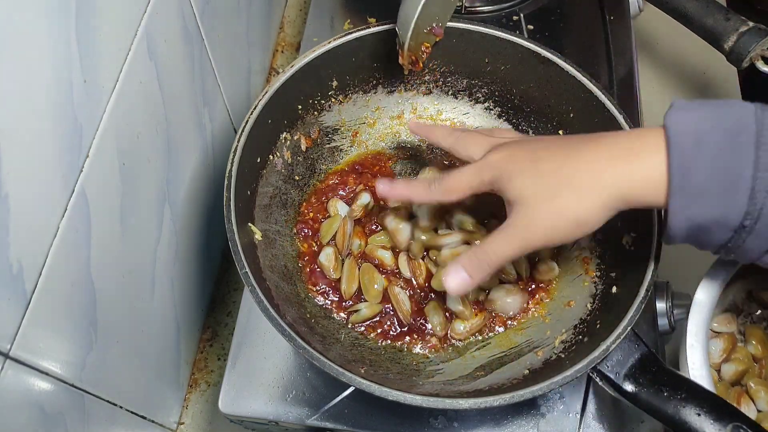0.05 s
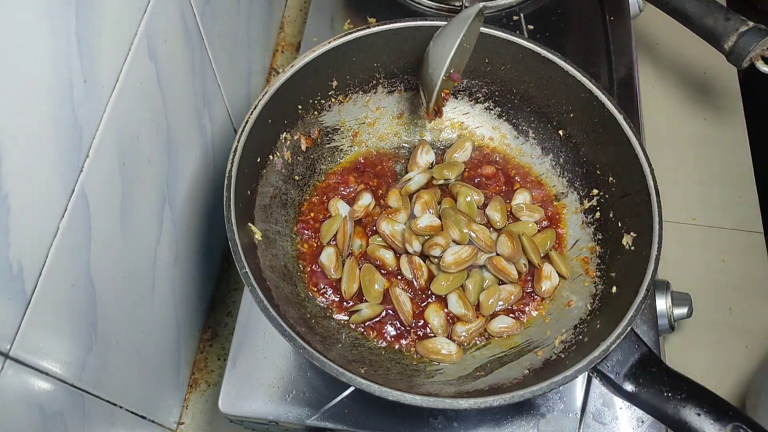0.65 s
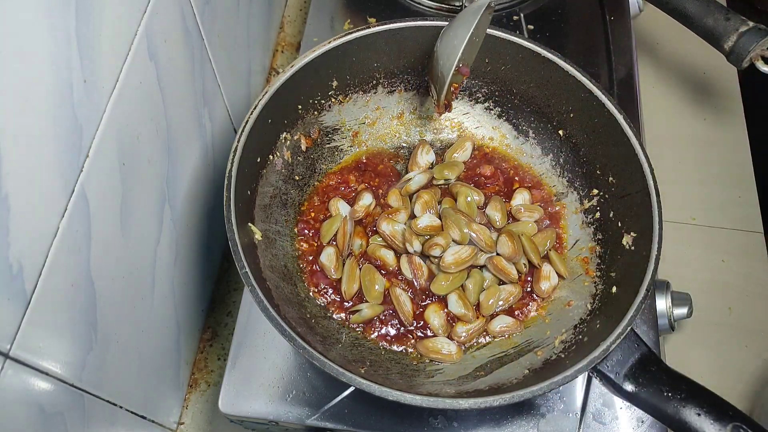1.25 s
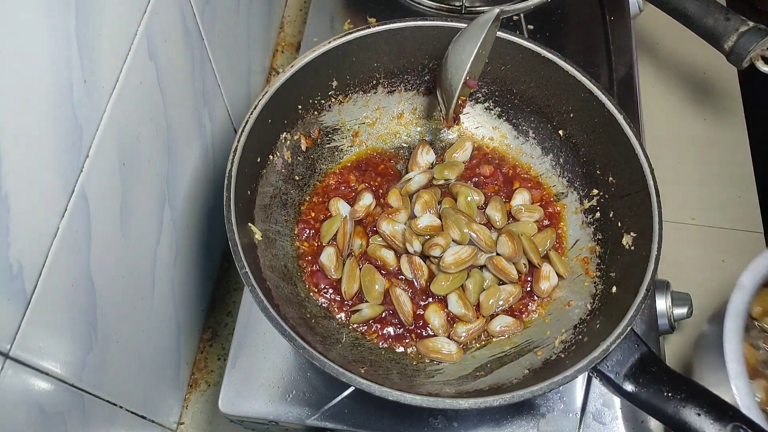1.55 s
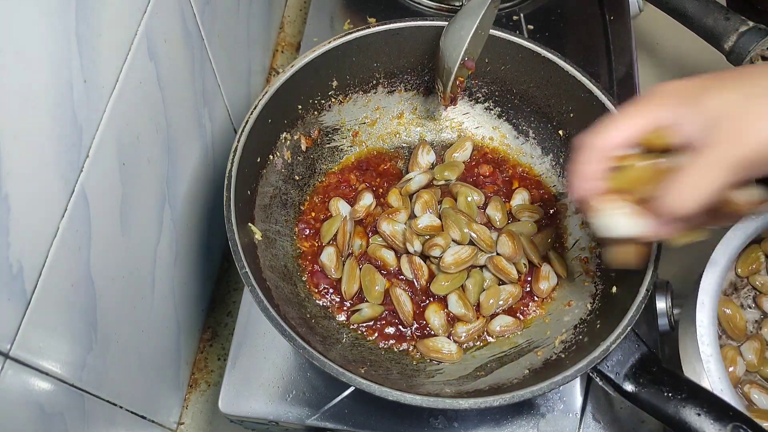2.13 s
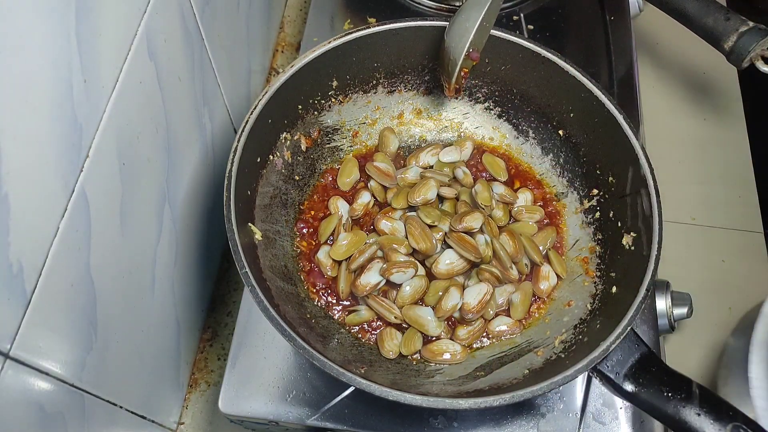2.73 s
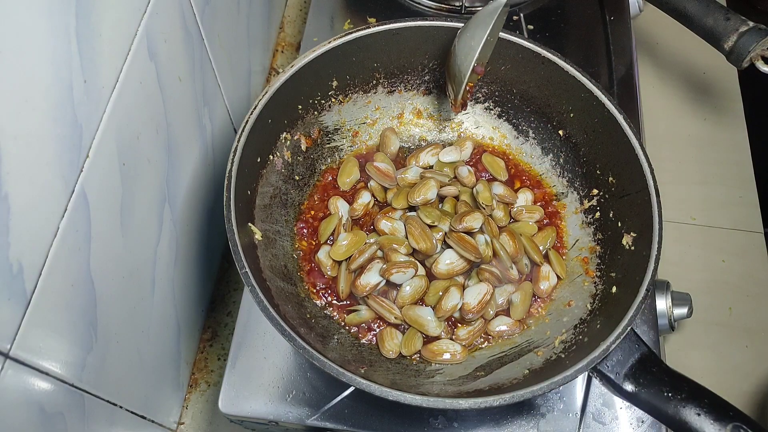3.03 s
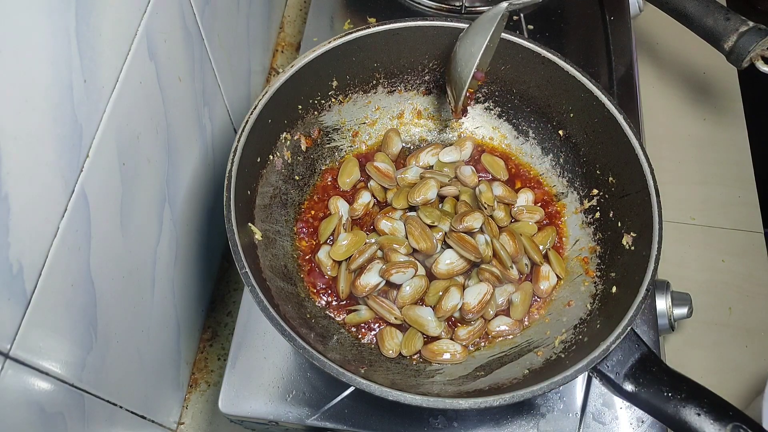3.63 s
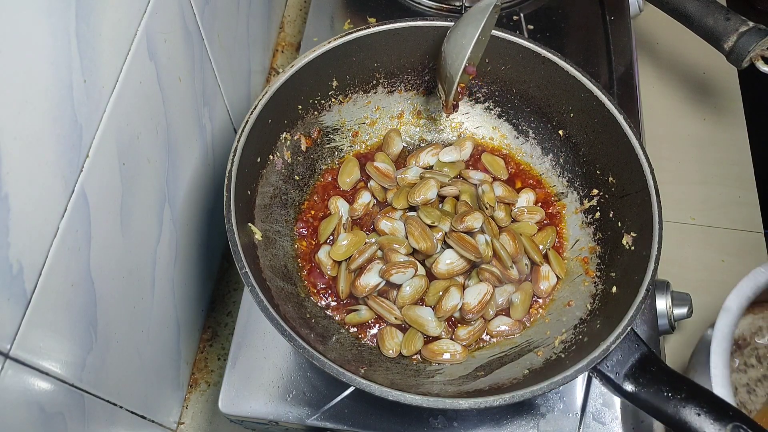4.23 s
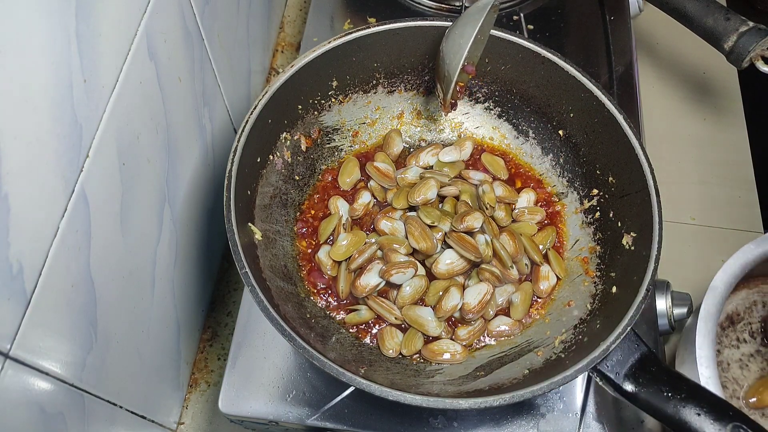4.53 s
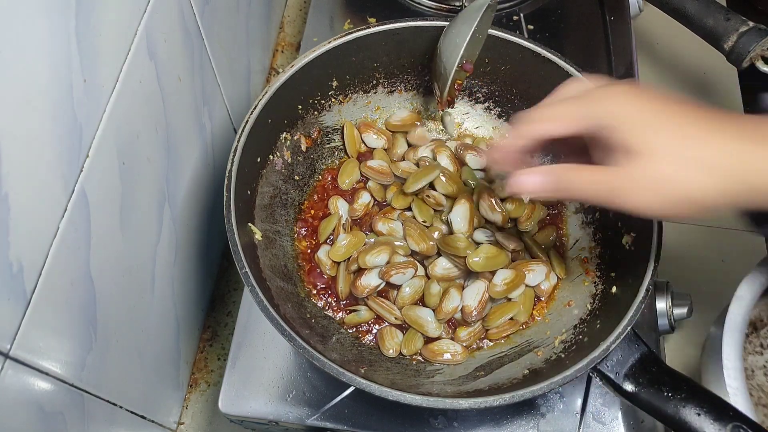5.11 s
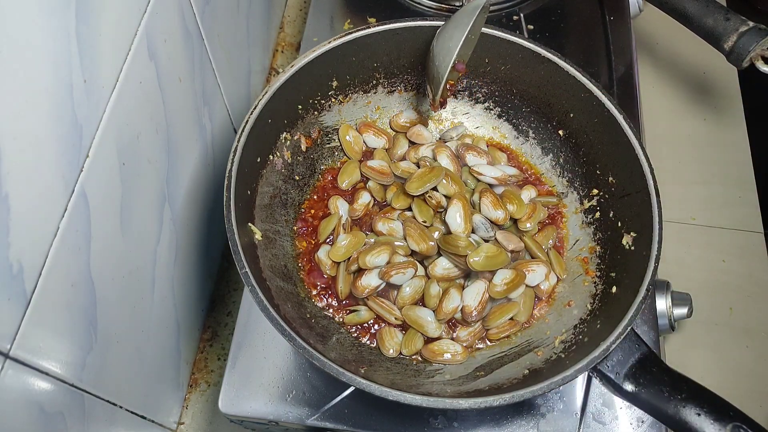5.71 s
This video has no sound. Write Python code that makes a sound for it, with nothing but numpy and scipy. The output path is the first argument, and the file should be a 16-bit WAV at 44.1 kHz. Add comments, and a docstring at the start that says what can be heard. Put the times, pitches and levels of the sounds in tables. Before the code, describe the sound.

Sauce sizzles gently in a wok as a light handful of small clams clicks into it. A hand rummages in a bowl of shells, then a louder handful clatters into the pan. More rattling in the bowl leads to a third handful, which makes the sauce spit. The frying grows a little after each drop. It is heard from close above the pan in a small tiled kitchen.

```python
"""Small clams clatter into a wok of gently sizzling sauce, three handfuls, with a hand rummaging in a
bowl of shells in between. Each hard contact rings one shell, snaps in the treble and knocks the vessel
beneath; countless light contacts rattle around it. Bubbles burst in the hot sauce, which spits and fries
harder after each wet handful. We listen from close above the pan, and a small tiled kitchen answers."""
import sys
import numpy as np
from scipy import signal
from scipy.fft import rfft, irfft
from scipy.io import wavfile
from scipy.ndimage import uniform_filter1d

SR = 44100
rng = np.random.default_rng(int(sys.argv[2]) if len(sys.argv) > 2 else 0)


def bounce(signal):
    """Save signal as a 16-bit WAV file at the path given by the first command-line argument."""
    frames = np.transpose(np.atleast_2d(signal))
    limited = np.clip(frames, -1, 1)
    pcm = np.round(limited * 32767).astype(np.int16)
    wavfile.write(sys.argv[1], SR, pcm)


N = 258602

# Tone of a shell's body, its thin rim and its snapping edge. Each row: frequency in Hz, relative dB.
SHELL_SPECTRUM = [(100, -7), (400, -31), (1000, -20), (1700, -2.5), (2400, -4.5), (3200, 2.5), (3800, 0.5),
                  (4500, -5.5), (5500, -9), (9000, -48)]
RIM_SPECTRUM = [(3000, -29), (4300, 2), (5100, 3.5), (5800, 2.5), (6600, 2.5), (7650, 6.5), (8000, 5.5),
                (8400, 5.5), (9500, -2.5), (12000, -58)]
SNAP_SPECTRUM = [(5000, -20.5), (8000, -45), (9200, -10), (10500, -5), (12000, -6.5), (13700, -1.5),
                 (15300, 2.5), (16000, -4)]
# Handfuls let go over the wok. Each row: first contact in seconds, level in dB, snap in relative dB,
# brief spitting in dB, lasting sizzle in dB, boil-off time constant in seconds.
HANDFULS = [(0.312, -29.5, 8.5, -34, -35, 2.9), (2.604, -22, 4, -49, -38.5, 25),
            (5.209, -24, 0, -26, -38.5, 2)]


def amp(db):
    """Decibels to gain."""
    return 10 ** (np.asarray(db) / 20)


def unit_rms(x):
    """Scales to an rms of one."""
    return x / np.sqrt(np.mean(x ** 2) + 1e-20)


def curve_at(points, hz):
    """Reads a curve on a log-frequency axis."""
    freqs, values = np.transpose(points)
    return np.interp(np.log(hz + 1), np.log(freqs + 1), values)


def impulse(spectrum, size=2048):
    """Minimum-phase impulse response with the given spectrum."""
    log_gain = np.log(amp(curve_at(spectrum, abs(np.fft.fftfreq(size, 1 / SR)))))
    return np.fft.ifft(np.exp(np.conj(signal.hilbert(log_gain)))).real[:size // 2]


def coloured(x, spectrum, size=2 ** 19):
    """Equalises a long sound and brings it to an rms of one."""
    gain = amp(curve_at(spectrum, np.fft.rfftfreq(size, 1 / SR)))
    return unit_rms(irfft(rfft(x, size) * gain)[:N])


def swell(start_s, end_s, rise_s, fall_s):
    """Envelope that grows exponentially until the start, holds at one until the end, then dies away."""
    t = np.arange(N) / SR
    return np.exp(-np.maximum(start_s - t, 0) / rise_s - np.maximum(t - end_s, 0) / fall_s)


def together(gains):
    """Joint level of unrelated sounds: their powers add."""
    return np.sqrt(sum(gain ** 2 for gain in gains))


def ticks(per_s, spread_db):
    """Random train of clicks, most small and a few large."""
    strength = amp(spread_db * np.minimum(rng.exponential(1, N), 4))
    return strength * rng.choice([-1, 1], N) * (rng.random(N) < per_s / SR)


def clinks(train, low_hz, high_hz, t60, size=768):
    """Each click of a train rings at a pitch of its own between low and high."""
    onsets, t = np.flatnonzero(train)[:, None], np.arange(size) / SR
    hz = low_hz + (high_hz - low_hz) * rng.random(N)[onsets]
    grains = train[onsets] * amp(-60 * t / t60) * np.sin(2 * np.pi * hz * t)
    return unit_rms(np.bincount((onsets + np.arange(size)).ravel(), grains.ravel(), N)[:N])


def crackle(train, decay_s):
    """Each click of a train becomes a tiny burst of noise."""
    energy = signal.lfilter([1], [1, -np.exp(-2 / (decay_s * SR))], train ** 2)
    return unit_rms(np.sqrt(energy) * rng.standard_normal(N))


def ring(modes, size=4096):
    """Ringing modes as dying cosines; where the blow lands decides the sign of each."""
    t = np.arange(size) / SR
    return sum(rng.choice([-1, 1]) * amp(db - 60 * t / t60) * np.cos(2 * np.pi * hz * t)
               for hz, db, t60 in modes)


def contact(blow_s, echo_db, size=4096):
    """One contact: a brief chatter of ridged shell on shell, then echoes inside the vessel."""
    t = np.arange(size) / SR
    progress = t / blow_s
    chatter = progress * np.exp(1 - progress)
    echoes = amp(echo_db) * (1 - np.exp(-progress)) * np.exp(-t / 0.014)
    return (chatter + echoes) * rng.standard_normal(size)


def struck(blow, response, attack_samples=353):
    """A response driven by a blow, with an rms of one over its first 8 ms."""
    sound = signal.fftconvolve(blow, response)[:len(blow)]
    return sound / np.sqrt(np.mean(sound[:attack_samples] ** 2))


def room_tone(level_db=-51.5):
    """A bed of low kitchen noise that swells a little at first, then holds."""
    # Tone of the room. Each row: frequency in Hz, relative dB.
    air_spectrum = [(20, -23), (60, -4.5), (130, -4), (260, -0.5), (430, -6.5), (750, -3.5), (1300, -8.5),
                    (3000, -6), (8000, -67)]
    fade_in = amp(np.interp(np.arange(N) / SR, [0, 1.2], [-4, 0]))
    return amp(level_db) * fade_in * coloured(rng.standard_normal(N), air_spectrum)


def kitchen_reverb(x, predelay_s=0.006):
    """Reflections from tiles and stove, each band dying at its own speed."""
    # Decay of the room. Each row: frequency in Hz, t60 in seconds.
    decay_times = [(200, 0.77), (1000, 0.18), (3000, 0.089), (8000, 0.1), (15000, 0.21)]
    reflections = rng.choice([-1., 1.], SR // 2) * (rng.random(SR // 2) < 4000 / SR)
    hz, t, bands = signal.stft(reflections, SR, nperseg=256)
    decay = amp(-60 * t / curve_at(decay_times, hz)[:, None])
    tail = signal.istft(bands * decay, SR, nperseg=256)[1]
    tail = np.concatenate([np.zeros(round(predelay_s * SR)), tail])
    return signal.oaconvolve(x, tail / np.linalg.norm(tail))[:N]


def bowl_bumps():
    """Soft low bumps as the bowl is handled."""
    # Each row: peak time in seconds, level in dB.
    bumps = [(1.872, -49.5), (2.43, -59), (3.15, -56), (3.372, -43.5), (3.455, -44), (3.545, -44)]
    # Their dull tone. Each row: frequency in Hz, relative dB.
    rumble_spectrum = [(15, -15), (45, -8), (110, -2), (170, -8.5), (300, -11), (600, -54)]
    level = together(amp(db) * swell(s, s, rise_s=0.031, fall_s=0.029) for s, db in bumps)
    return level * coloured(rng.standard_normal(N), rumble_spectrum)


def frying_level(simmer_db=-43.5, flare_delay_s=0.17, wetting_s=0.11):
    """The sauce simmers; each wet handful makes it spit, then fry harder until the water boils off."""
    gains = [amp(simmer_db)]
    for s, _, _, spit_db, lasting_db, boil_off_s in HANDFULS:
        peak_s = s + flare_delay_s
        gains.append(amp(spit_db) * swell(peak_s, peak_s, wetting_s, fall_s=0.12))
        gains.append(amp(lasting_db) * swell(peak_s, peak_s, wetting_s, boil_off_s))
    return together(gains)


def sizzle(hiss_db=-1, surge_db=1.1):
    """Thousands of tiny bubbles burst in the hot sauce over a fine hiss, in small surges."""
    # Tone of the frying. Each row: frequency in Hz, relative dB.
    sizzle_spectrum = [(300, -25), (1300, -17), (1900, -12), (2700, -13), (3300, -1.5), (4000, -9),
                       (5800, -8), (7400, -1.5), (8300, -8), (9800, -9), (10500, -5.5), (11800, -8.5),
                       (14000, -3), (15400, 1.5)]
    bursts = ticks(per_s=5000, spread_db=3)
    pops = clinks(bursts, 2500, 15500, t60=0.006, size=256) + 0.7 * crackle(bursts, decay_s=0.002)
    surge = unit_rms(uniform_filter1d(uniform_filter1d(rng.standard_normal(N), 2000), 1500))
    hiss = amp(hiss_db) * rng.standard_normal(N)
    return frying_level() * amp(surge_db * surge) * coloured(pops + hiss, sizzle_spectrum)


def hollow(x, peaks):
    """Echoes between the vessel's walls lift a few bands; things this small radiate almost no bass."""
    resonance = sum(amp(db) * signal.lfilter(*signal.iirpeak(hz, hz / width, SR), x)
                    for hz, width, db in peaks)
    return signal.sosfilt(signal.butter(2, 360, "highpass", fs=SR, output="sos"), x + resonance)


def rattle(moves, modes, per_s, spread_db, shell_t60, body_db, vessel_db, rim_db, snap_db):
    """Light contacts among shells of many sizes; each move of the heap is an envelope and a snap in dB."""
    train = ticks(per_s, spread_db)
    energy = abs(uniform_filter1d(train ** 2, round(0.01 * SR)))
    train /= np.sqrt(energy + per_s / SR * 0.052)  # the contacts share the heap's energy
    grit = crackle(train, decay_s=0.0082)
    shells = clinks(train, 1100, 4800, shell_t60) + 0.5 * grit
    edges = clinks(train, 4300, 8800, shell_t60) + 0.5 * grit
    level = together(gain for gain, _ in moves)
    treble = together(gain * amp(bright_db) for gain, bright_db in moves)
    body = amp(body_db) * coloured(shells, SHELL_SPECTRUM)
    knock = amp(vessel_db) * unit_rms(signal.oaconvolve(train, ring(modes))[:N])
    rims = amp(rim_db) * np.sqrt(level * treble) * coloured(edges, RIM_SPECTRUM)
    snap = amp(snap_db) * treble * coloured(grit, SNAP_SPECTRUM)
    return level * (body + knock) + rims + snap


def clacks(hits, modes, blow_s, ring_db, cavity_db, body_db, vessel_db, rim_db, snap_db, shell_t60=0.015):
    """Hard contacts: the shell rings at its own pitch, its rim and edge snap, the vessel knocks."""
    mix = np.zeros(N)
    body, rim, snap = impulse(SHELL_SPECTRUM), impulse(RIM_SPECTRUM), impulse(SNAP_SPECTRUM)
    for s, db, hz, knock_db, thin_db, bright_db in hits:
        blow, body_blow, rim_blow, snap_blow = (contact(blow_s, echo_db) for echo_db in (-12, -7, -6, -7))
        clack = amp(ring_db) * struck(blow, ring([(hz, 0, shell_t60)], size=1024))
        clack += amp(body_db) * struck(body_blow, body)
        cavity = ring([(rng.uniform(1253, 2490), 0, 0.03)], size=2048)  # a hollow among the shells
        clack += amp(cavity_db) * struck(blow, cavity)
        # The shifting heap detunes the vessel.
        detuned = [(mode_hz * rng.uniform(0.93, 1.07), level, t60) for mode_hz, level, t60 in modes]
        clack += amp(vessel_db + knock_db) * struck(blow, ring(detuned))
        overtone = ring([(rng.uniform(5440, 7730), 0, shell_t60)], size=1024)  # each rim's own pitch
        clack += amp(rim_db + thin_db) * (struck(rim_blow, rim) + struck(rim_blow, overtone))
        clack += amp(snap_db + bright_db) * struck(snap_blow, snap)
        slot = mix[round(s * SR):][:len(clack)]
        slot += amp(db) * clack[:len(slot)]
    return mix


def clams_in_bowl():
    """A hand digs and stirs in the bowl, so the shells knock together and rattle."""
    # Hard contacts. Each row: start in seconds, level in dB, shell pitch in Hz, then vessel knock,
    # rim and snap trims in dB.
    hits = [(1.005, -21, 3500, -10.5, -8, -3.5), (1.168, -30.5, 3060, -7.5, 2.5, 2.5),
            (1.321, -28, 3750, -12, -3.5, -10), (1.484, -32.5, 3380, -2, -10, 4),
            (1.54, -27, 3200, -4.5, 4, 3), (1.609, -28, 3630, -14, -10, -12),
            (1.648, -27, 3770, -15, -1.5, -3.5), (1.753, -43, 2950, 6.5, 8.5, 2),
            (1.83, -31.5, 3520, -4, 14.5, 9), (1.88, -34, 2180, -11, -2.5, -11),
            (1.939, -38, 3270, -21, 2.5, 2.5), (3.19, -31.5, 3270, -32, -5, -26.5),
            (3.286, -23.5, 2900, -7, -4.5, -8), (3.315, -20, 2770, -32, -23, -11),
            (3.338, -24.5, 2840, -35, -23, -7), (3.435, -25, 2310, -17, -8, -10),
            (3.47, -23.5, 3500, -20, -8, -4.5), (3.539, -27, 3230, -9.5, -2.5, -2.5),
            (3.673, -19.5, 3380, -28, 0, 2), (3.694, -18, 3170, -31, 5, -2.5),
            (3.769, -25, 3020, -45, -3, -3), (3.813, -24, 3620, -9.5, -0.5, -2),
            (3.94, -32.5, 3400, -1, 0.5, -3), (4.011, -22.5, 3240, -22, -8, -12),
            (4.07, -35, 3760, -23, -2, -4), (4.151, -25, 3510, -15, 1.5, 0),
            (4.195, -28, 3120, -10, 4.5, -10), (4.203, -30, 2720, -2, 6.5, 5.5),
            (4.328, -33, 3200, -18.5, -1.5, -2), (4.407, -15, 2220, -8, -5.5, -8),
            (4.435, -18.5, 2350, -12, -10, -7), (4.475, -17, 3500, -8, -0.5, -0.5),
            (4.489, -26.5, 3370, -8, 1, 4), (4.552, -29, 2980, -32, -8, -10),
            (5.791, -23, 3370, -18, -8, -9), (5.822, -16, 2980, -17, -5.5, -8)]
    # The bowl's ring. Each row: frequency in Hz, relative dB, t60 in seconds.
    modes = [(497, -5, 0.01), (591, 2.5, 0.034), (870, -2, 0.015), (1165, -5.5, 0.028), (1300, -22, 0.23),
             (1960, -9, 0.086), (2322, -0.5, 0.049)]
    # The bowl's hollow. Each row: centre in Hz, width in Hz, gain of the added band in dB.
    peaks = [(1180, 330, -4), (3200, 480, -1), (5700, 450, -1)]
    # Fingers push in. Each row: peak time in seconds, level in dB, rise and fall time constants
    # in seconds, snap in relative dB.
    digs = [(0.976, -24.5, 0.022, 0.065, -2.5), (1.105, -33.5, 0.027, 0.04, 1),
            (1.205, -28, 0.041, 0.078, -2.5), (1.49, -23.5, 0.025, 0.038, -2.5),
            (1.84, -36.5, 0.032, 0.043, -1.5), (3.227, -29.5, 0.0097, 0.038, -1.5),
            (3.335, -22.5, 0.057, 0.054, -11.5), (3.693, -22, 0.054, 0.038, 2.5),
            (3.826, -26, 0.039, 0.02, -10), (4.205, -31.5, 0.03, 0.025, -4), (4.485, -28, 0.065, 0.057, -7),
            (4.628, -39.5, 0.008, 0.017, -4), (4.867, -45.5, 0.008, 0.06, 4),
            (5.695, -40.5, 0.016, 0.015, 3.5), (5.85, -17.5, 0.027, 0.08, -11)]
    # Light stirring between digs. Each row: start and end in seconds, level in dB, snap in relative dB.
    stirs = [(0.985, 1.82, -42, -3), (3.28, 3.796, -38.5, -6.5), (3.935, 4.205, -39.5, -7)]
    moves = [(amp(db) * swell(s, s, rise, fall), snap) for s, db, rise, fall, snap in digs]
    moves += [(amp(db) * swell(start, end, 0.065, 0.065), snap) for start, end, db, snap in stirs]
    hard = clacks(hits, modes, blow_s=0.0025, ring_db=-4.5, cavity_db=-15,
                  body_db=-9.5, vessel_db=-4, rim_db=-5, snap_db=2)
    light = rattle(moves, modes, per_s=800, spread_db=2, shell_t60=0.026,
                   body_db=-3.5, vessel_db=-17, rim_db=-3.5, snap_db=0.5)
    return hollow(hard + light, peaks)


def pour(start_s, first_touch_db=-15.5, build_s=0.052, settle_db_per_s=113):
    """Envelope of a falling handful: a light first touch, thickest a moment later, then it settles."""
    age = np.arange(N) / SR - start_s
    build_db = first_touch_db * np.maximum(1 - age / build_s, 0)
    settle_db = settle_db_per_s * np.maximum(age - build_s, 0)
    return (age > 0) * amp(build_db - settle_db)


def clams_in_wok():
    """Handfuls land in the wok: some shells hit hard while the rest rattle into a heap."""
    # Hard landings. Each row: start in seconds, level in dB, shell pitch in Hz, then vessel knock,
    # rim and snap trims in dB.
    hits = [(0.261, -56.5, 4350, 1, 13.5, 16), (0.375, -31, 3270, -2.5, 4, 2),
            (0.437, -29.5, 3300, -31, 7.5, 9), (0.471, -34.5, 3660, -24, 11, 11),
            (2.609, -32, 4500, -23, -1, 5), (2.643, -23, 3160, -40, -20, -3),
            (2.662, -15, 3220, -37, -18, -4), (2.679, -15.5, 3220, -32, -3.5, 0.5),
            (2.701, -23, 2590, -27, 1, 1.5), (2.722, -26.5, 3140, -29, -2, -7),
            (2.744, -28, 3130, -34, -21, -20), (2.756, -31, 3120, -22, 7.5, 7.5),
            (2.835, -38, 3150, -20, -3, -5), (5.043, -47.5, 3900, -7, -11, 16.5),
            (5.2, -35.5, 2230, -25, -16, -16), (5.232, -23.5, 3210, -13, -5, 2),
            (5.266, -24, 2980, -26, 2, 12), (5.279, -20, 2700, -7.5, -4, -6),
            (5.292, -19, 3380, -5.5, -5, -2), (5.329, -23.5, 2940, -2, -6, 1.5),
            (5.385, -31.5, 3080, -1, 12, 5), (5.402, -35, 4600, -5, 15.5, 16),
            (5.582, -54, 3340, -5, 0, 13)]
    # The wok's ring. Each row: frequency in Hz, relative dB, t60 in seconds.
    modes = [(526, -11.5, 0.13), (729, 5.5, 0.031), (970, 8.5, 0.0073), (1485, -21, 0.018),
             (1897, 13.5, 0.018), (2077, 4, 0.14)]
    # The wok's hollow. Each row: centre in Hz, width in Hz, gain of the added band in dB.
    peaks = [(2600, 700, -5), (7650, 300, -8)]
    moves = [(amp(db) * pour(s), snap) for s, db, snap, *_ in HANDFULS]
    hard = clacks(hits, modes, blow_s=0.0019, ring_db=-1, cavity_db=-16,
                  body_db=-6.5, vessel_db=-4, rim_db=-4, snap_db=2)
    light = rattle(moves, modes, per_s=1000, spread_db=3, shell_t60=0.03,
                   body_db=-0.5, vessel_db=-12, rim_db=-5.5, snap_db=-4)
    return hollow(hard + light, peaks)


def scene():
    """Clams in the wok and the bowl with their reverb, over sizzle and room tone, in mono."""
    wok, bowl = clams_in_wok(), clams_in_bowl()
    reverb = kitchen_reverb(amp(-5) * wok + amp(-8) * bowl)
    return (wok + bowl + reverb + sizzle() + room_tone() + bowl_bumps())[None]


def record(dry):
    """Soft saturation rounds off the highest peaks, then a steep low-pass trims the top."""
    lowpass = signal.firwin(511, cutoff=15600, window=("kaiser", 9), fs=SR)
    return signal.oaconvolve(np.tanh(dry), lowpass[None], "same")


dry = scene()
out = record(dry)
bounce(out)
```